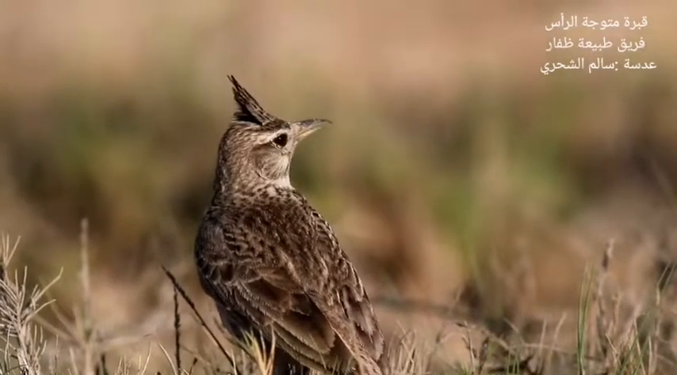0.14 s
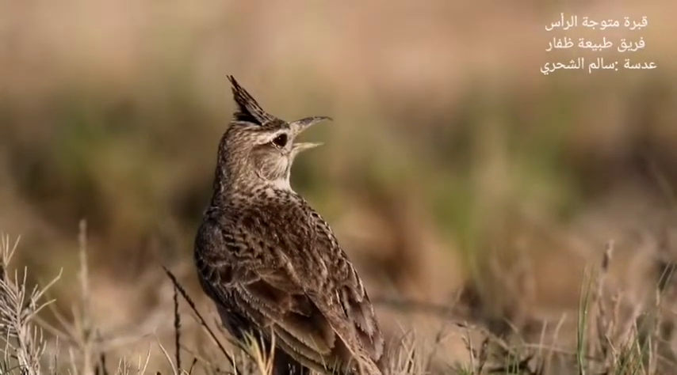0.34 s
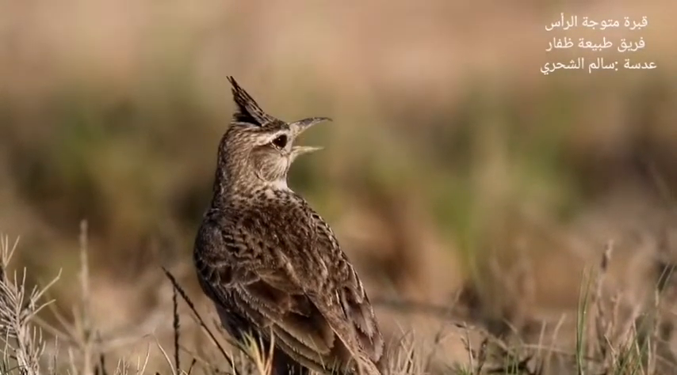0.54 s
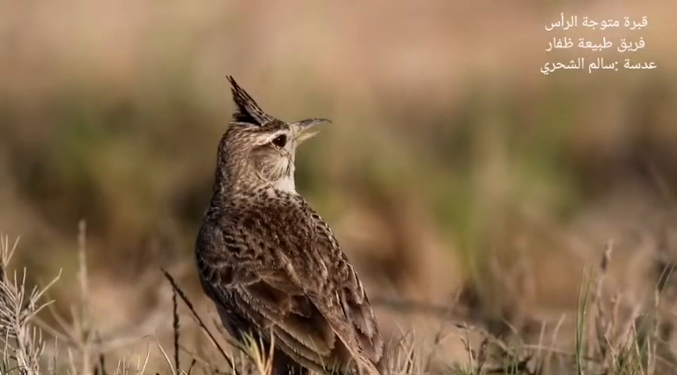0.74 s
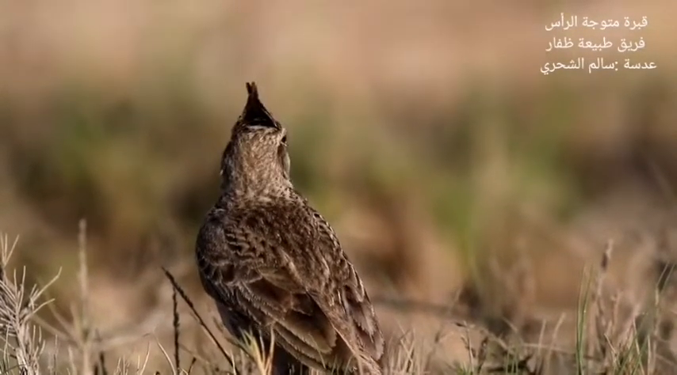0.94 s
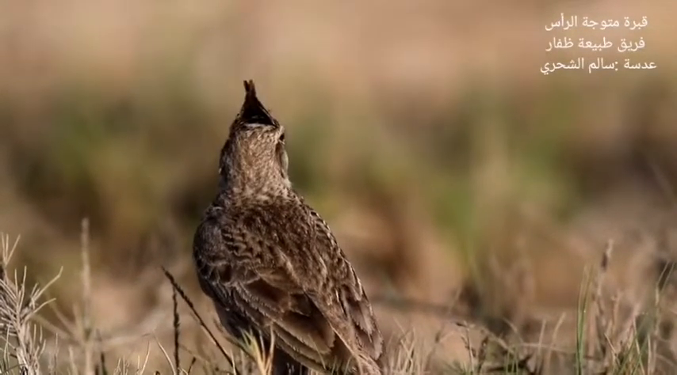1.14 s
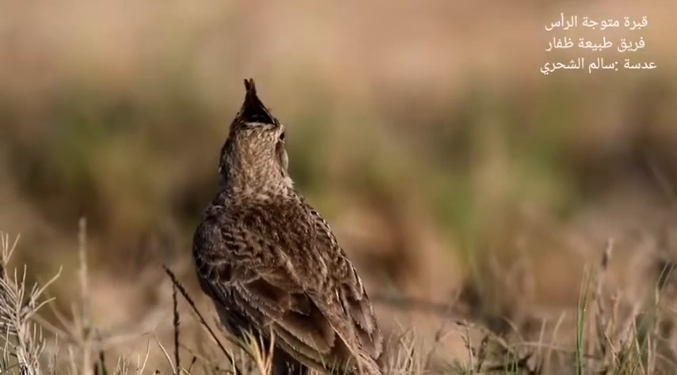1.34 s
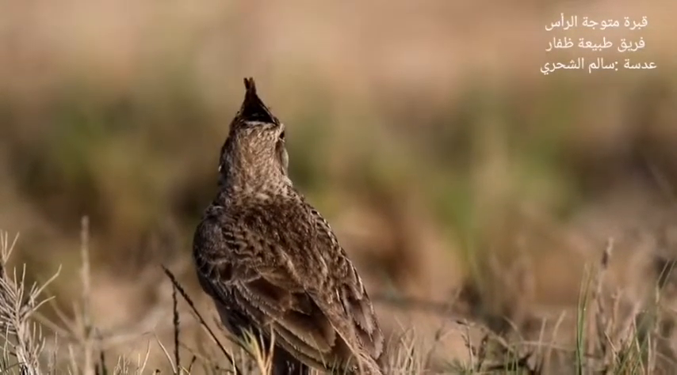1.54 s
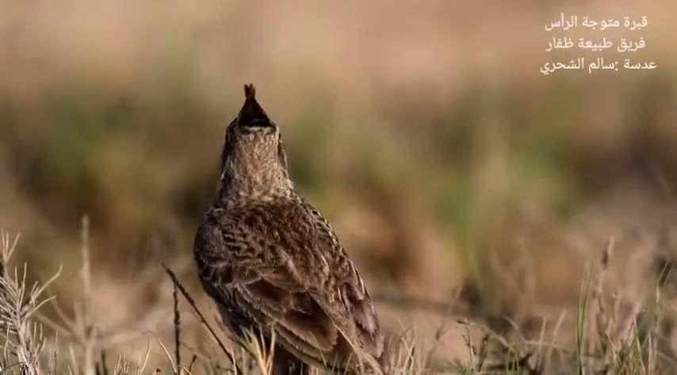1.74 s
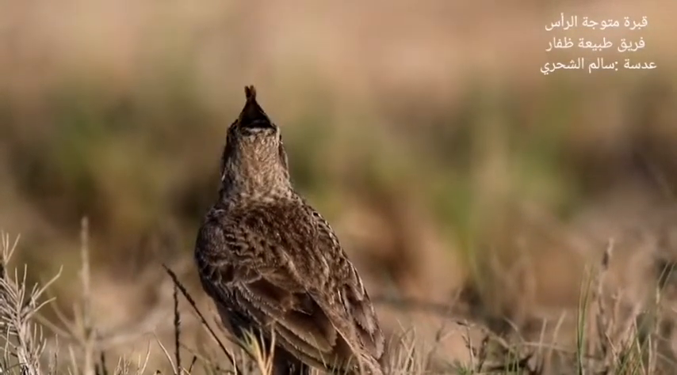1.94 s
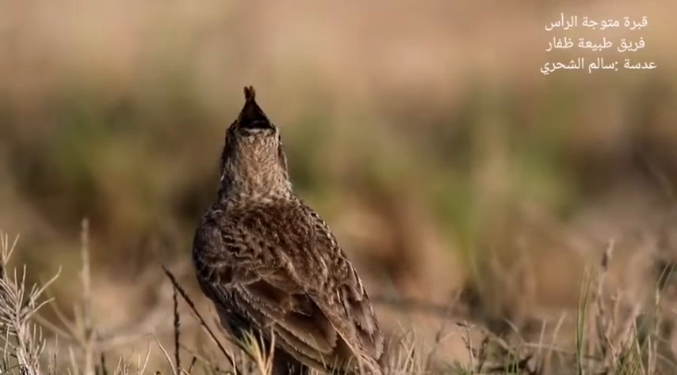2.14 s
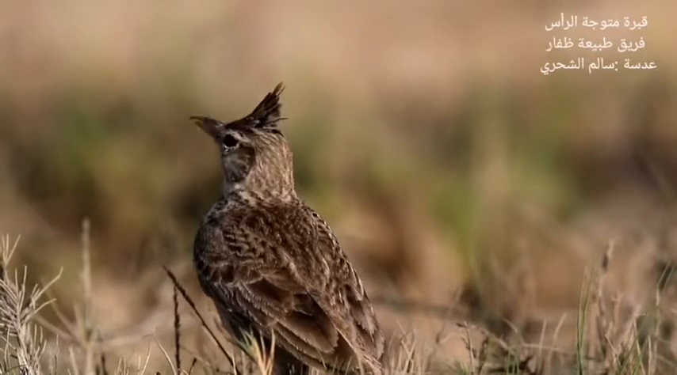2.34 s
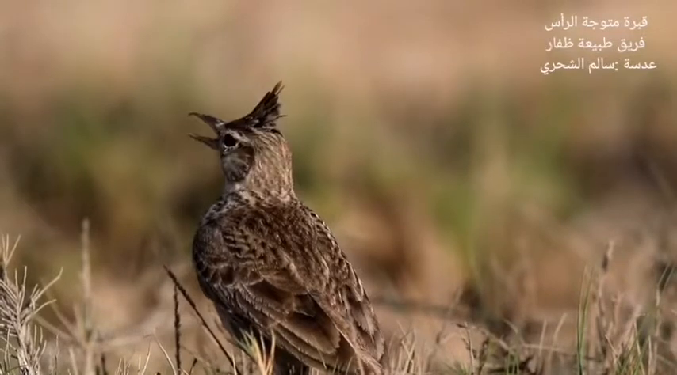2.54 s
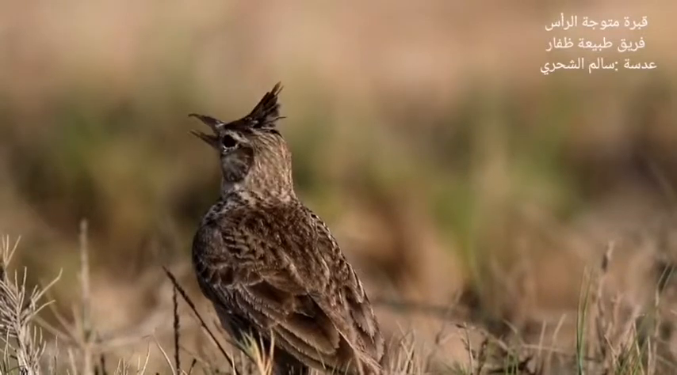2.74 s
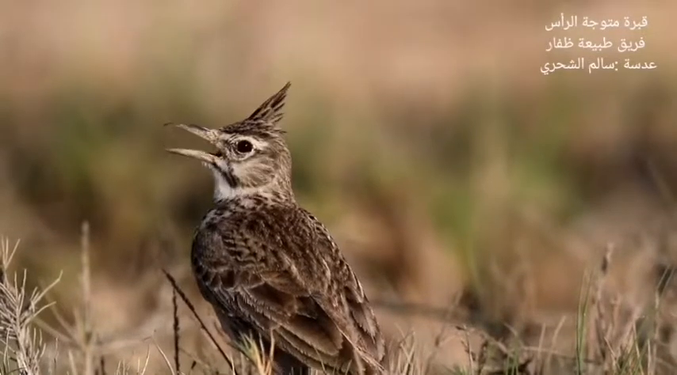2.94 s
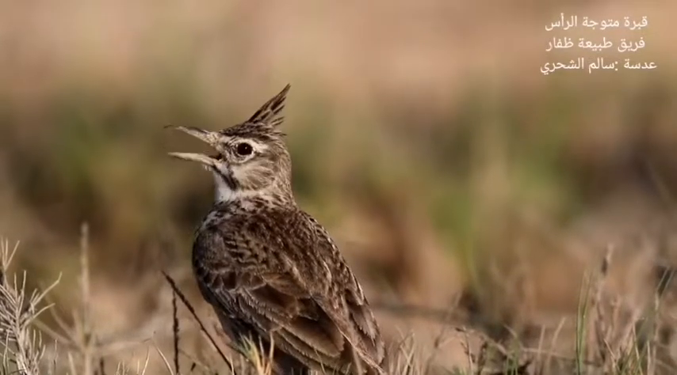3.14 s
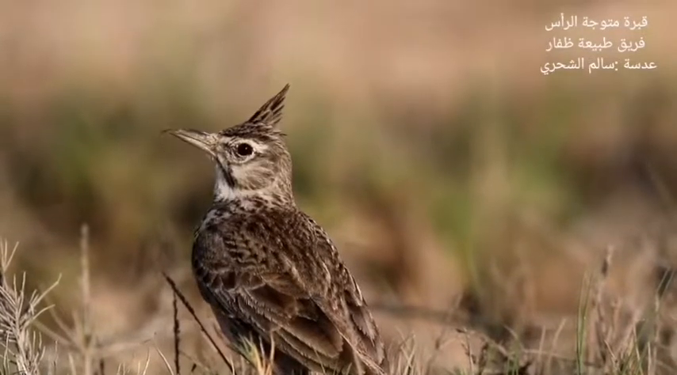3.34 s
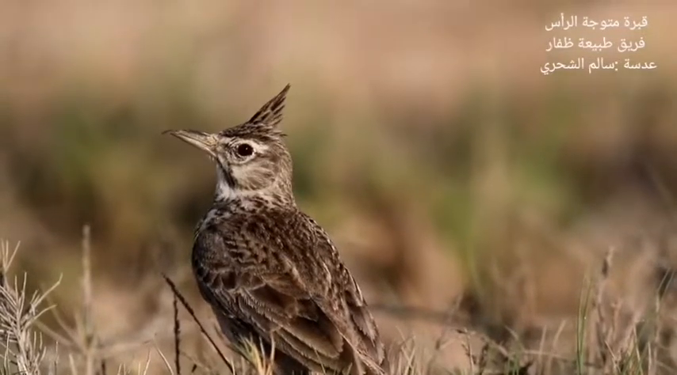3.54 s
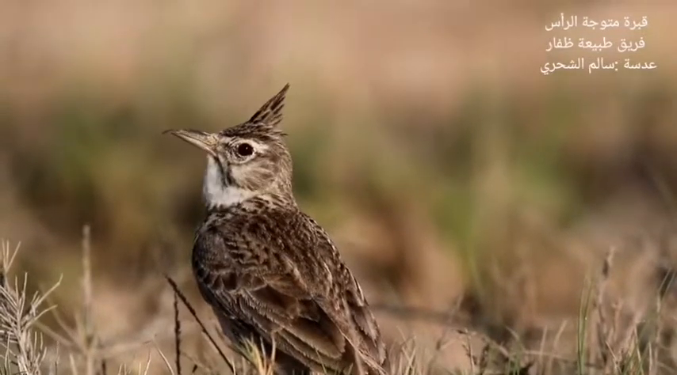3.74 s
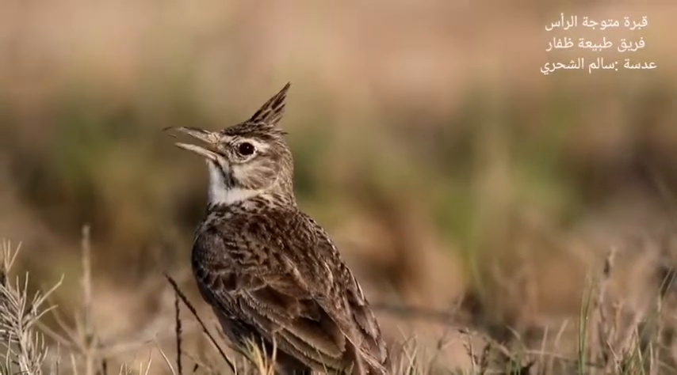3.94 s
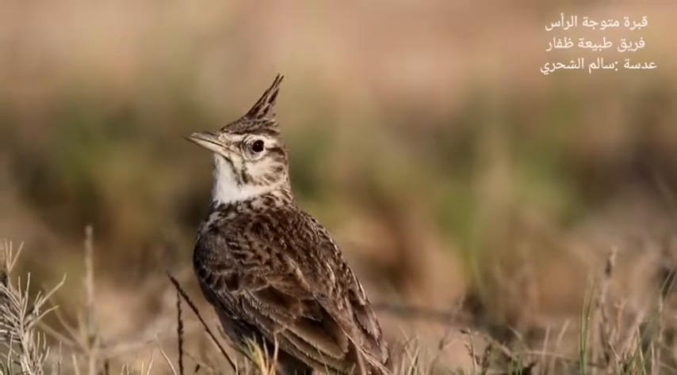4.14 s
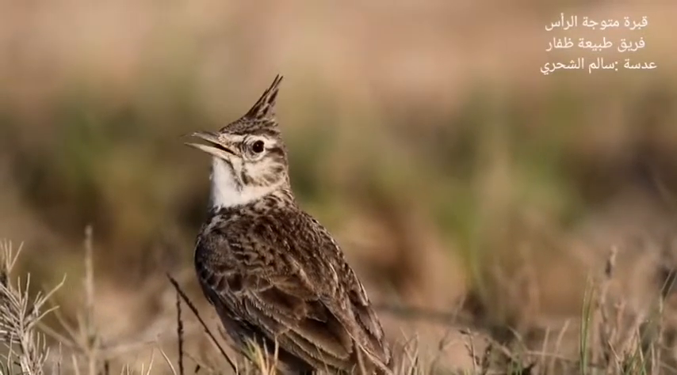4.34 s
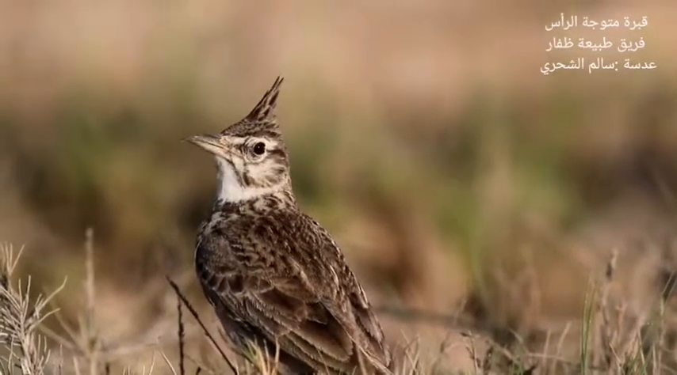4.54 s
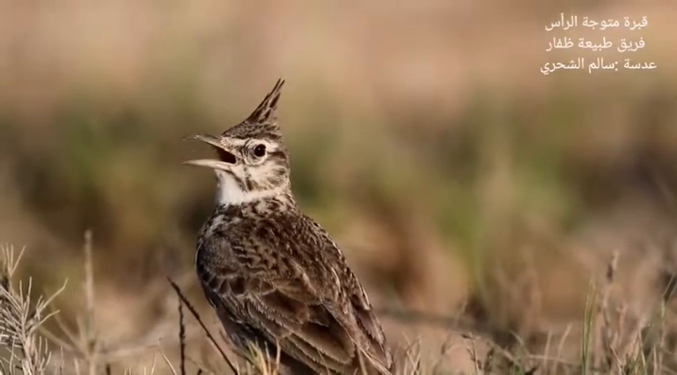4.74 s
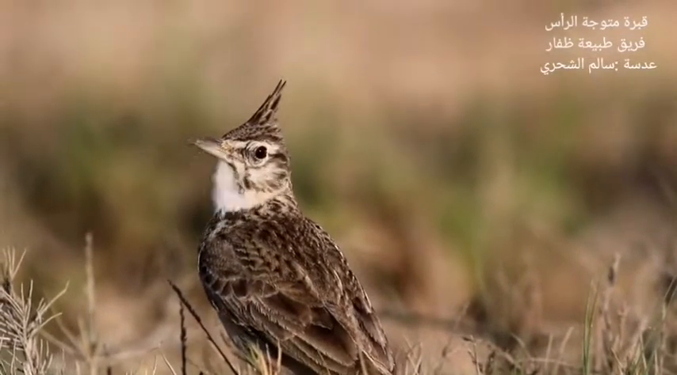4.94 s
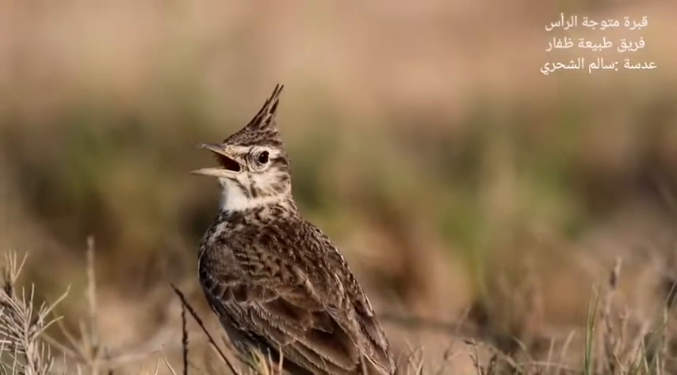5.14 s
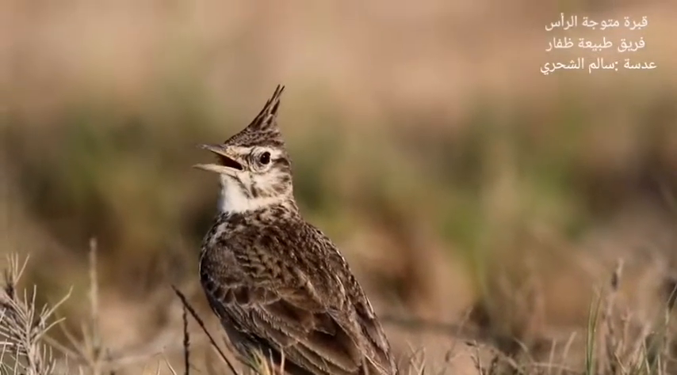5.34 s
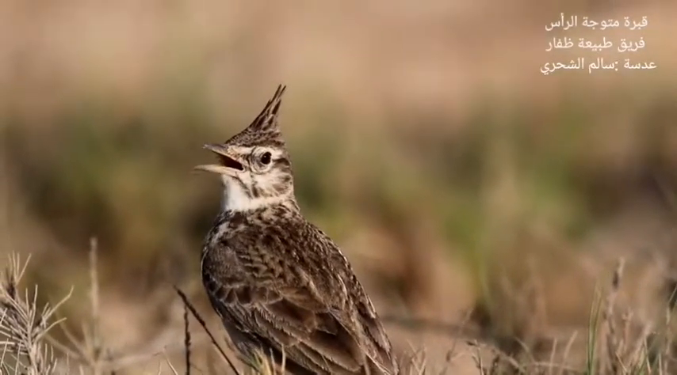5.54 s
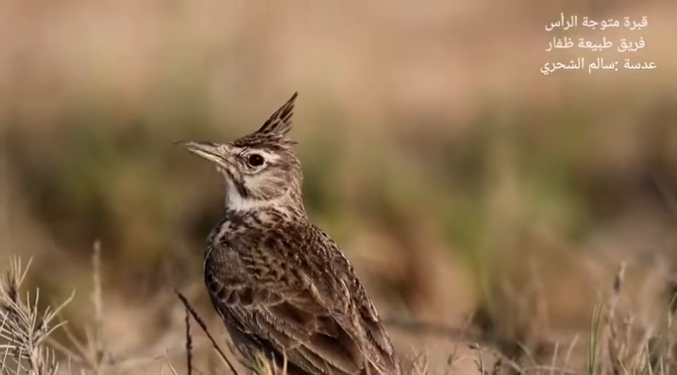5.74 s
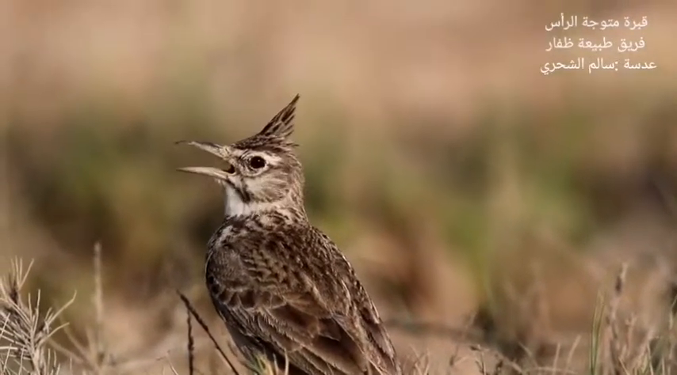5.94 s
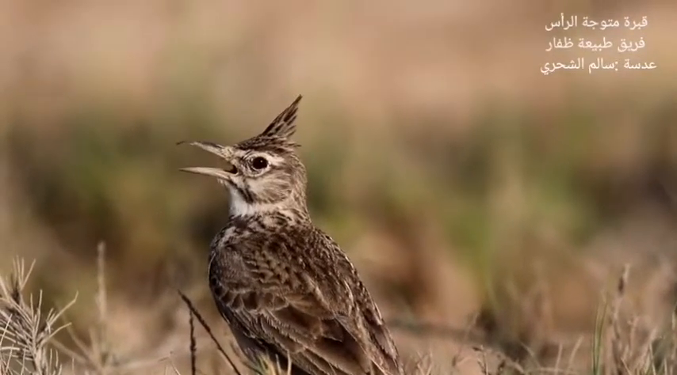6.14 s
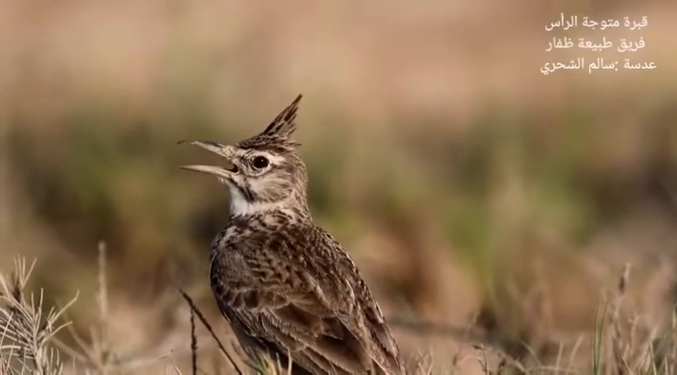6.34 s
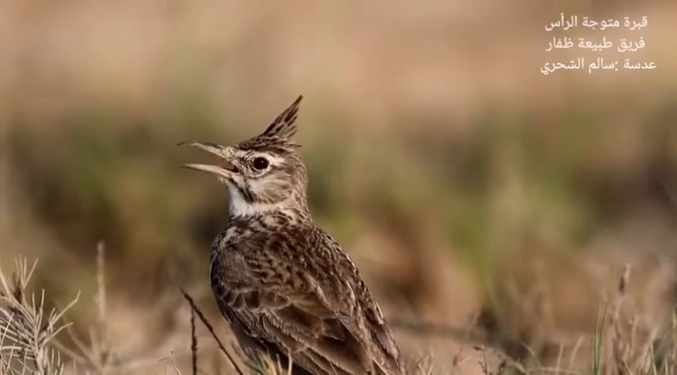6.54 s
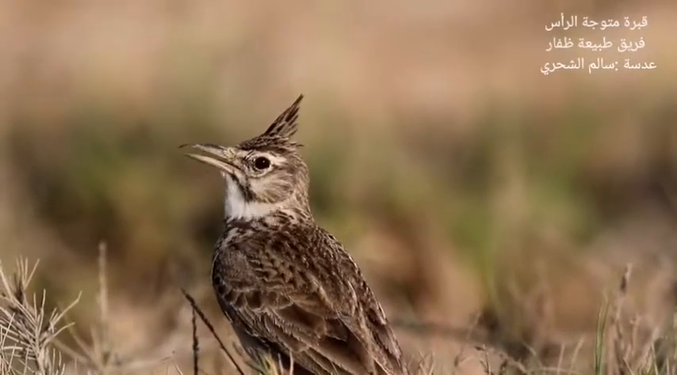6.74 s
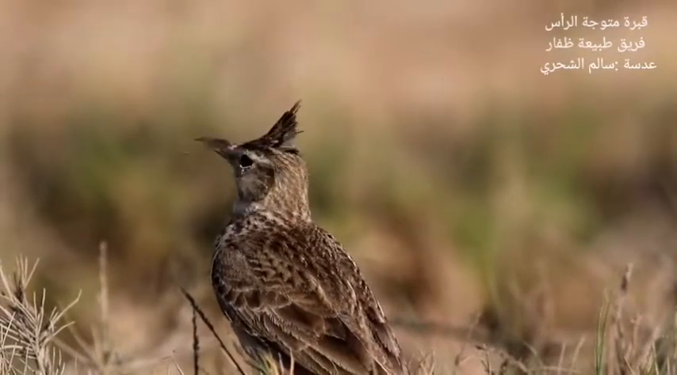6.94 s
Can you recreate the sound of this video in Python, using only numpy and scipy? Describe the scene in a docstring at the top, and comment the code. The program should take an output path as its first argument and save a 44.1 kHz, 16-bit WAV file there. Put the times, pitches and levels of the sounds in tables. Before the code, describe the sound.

A small crested lark sings close by, slurred whistles turning to rasps, chips and quick hooked chirps, over faint low wind rumble.

```python
"""Slurred whistles of a crested lark open close by, over light wind; rasps, pressed falls, chips and hooked chirps follow.
Additive synthesis makes the song: one syrinx tone, its overtones and a half-pitch series, balanced by a throat resonance.
How sound carries at each pitch favours whistles, falls and hooks near 4 kHz; scattering in the scrub adds a faint echo.
Filtered noise makes the air, the wind rumble on the microphone and a few soft ticks.
A gliding sine with a diffuse echo makes another bird, far off."""
import sys
import numpy as np
from scipy import signal
from scipy.fft import rfft, irfft, next_fast_len
from scipy.io import wavfile
from scipy.ndimage import uniform_filter1d, map_coordinates

SR = 44100
rng = np.random.default_rng(int(sys.argv[2]) if len(sys.argv) > 2 else 0)


def generate_wav(signal):
    """Clip the signal to [-1, 1] and save it as 16-bit WAV at the path in sys.argv[1]."""
    frames = np.transpose(np.atleast_2d(signal))
    scaled = np.clip(frames, -1, 1) * 32767
    pcm = np.round(scaled).astype(np.int16)
    wavfile.write(sys.argv[1], SR, pcm)


N = 312228  # samples


def amp(db):
    """Logarithmic level: decibels to amplitude gain."""
    return 10 ** (np.asarray(db) / 20)


def unit(x):
    """Normalisation: scale to rms 1."""
    return x / np.sqrt(np.mean(x ** 2) + 1e-20)


def along(points, hz):
    """Spectral envelope: interpolate (Hz, dB) points on a log frequency axis."""
    point_hz, point_db = np.transpose(points)
    return np.interp(np.log(hz + 1), np.log(point_hz), point_db)


def clock():
    """Sampling: the time of every sample, in seconds."""
    return np.arange(N) / SR


def times(start, end):
    """Sampling: the sample times of one syllable, in seconds."""
    return np.arange(round(start * SR), round(end * SR)) / SR


def window(start, end, fade):
    """Gating: a pulse between two times, with squared-sine edges."""
    t = clock()
    return np.sin(np.pi / 2 * np.clip(np.minimum(t - start, end - t) / fade, 0, 1)) ** 2


def swell(s, attack, release):
    """Amplitude envelope: level in dB of a note that opens and closes."""
    opening = np.clip((s - s[0]) / attack, .01, 1) * np.clip((s[-1] - s) / release, .01, 1)
    return 20 * np.log10(np.sin(np.pi / 2 * opening) * opening ** .5)


def wobble(rate):
    """Slow random modulation: a smooth curve through 'rate' random knots a second."""
    knots = rng.standard_normal(int(N * rate / SR) + 4)
    return map_coordinates(knots, [clock() * rate])


def filtered(x, response):
    """Linear filtering: multiply the spectrum by a response of frequency."""
    m = next_fast_len(N + SR // 2)  # padding keeps the end from wrapping round
    return irfft(rfft(x, m) * response(np.fft.rfftfreq(m, 1 / SR)), m)[:N]


def noise(spectrum):
    """Subtractive synthesis: white noise coloured by a spectrum, at rms 1."""
    return unit(filtered(rng.standard_normal(N), lambda hz: amp(along(spectrum, hz))))


# quiet air of the plain, spectral shape: frequency_hz, relative_level_per_hz_db
AIR_SPECTRUM = [(150, -30.5), (250, 0.5), (466, -4.5), (770, -3), (1320, -5.5), (1990, -2.5), (2580, -14.5),
                (3980, -10.5), (5070, -25.5), (7950, -18), (8670, -20), (14100, -26.5), (15600, -38)]


def air(level_db):
    """Stationary random sound: coloured noise at a constant rms level."""
    return amp(level_db) * noise(AIR_SPECTRUM)


# steady breeze, spectral shape: frequency_hz, relative_level_per_hz_db
BREEZE_SPECTRUM = [(15, -43.5), (25, -13), (90, 1), (188, -7), (219, -13.5), (288, -23), (500, -33),
                   (650, -51.5), (1100, -120)]
# gusts, spectral shape: frequency_hz, relative_level_per_hz_db
GUST_SPECTRUM = [(21, -40.5), (35, -8.5), (96, 0.5), (115, 0), (298, -17), (473, -33.5), (600, -37.5),
                 (780, -69), (1320, -120)]
# bell-shaped gusts on the microphone: centre_s, standard_deviation_s, level_db
GUSTS = [(1.718, 0.078, -37), (1.889, 0.026, -34), (2.162, 0.054, -31), (3.094, 0.054, -35.5),
         (4.502, 0.025, -34.5), (4.57, 0.023, -34), (5.609, 0.027, -32), (5.718, 0.025, -32.5),
         (6.022, 0.0098, -27.5), (6.278, 0.016, -27), (6.366, 0.018, -26), (6.856, 0.16, -30),
         (7.044, 0.019, -31.5)]
# sharp eddies: centre_s, peak_db
EDDIES = [(1.838, -17.5), (4.494, -20.5), (5.613, -13.5)]


def wind(breeze_db, thump_hz, thump_width):
    """Turbulent pressure: a breeze and lumpy gusts of noise; the sharpest eddies give one low push."""
    t = clock()
    gusts = sum(amp(db) * np.exp(-((t - s) / width) ** 2 / 2) for s, width, db in GUSTS)
    lumps = amp(2 * wobble(35))
    breeze = amp(breeze_db + 1.5 * wobble(14)) * noise(BREEZE_SPECTRUM)
    buffeting = gusts * lumps * noise(GUST_SPECTRUM)
    thumps = np.zeros(N)
    for s, db in EDDIES:
        burst = np.exp(-((t - s) / thump_width) ** 2)
        thumps += amp(db) * burst * np.cos(2 * np.pi * thump_hz * (t - s))
    return breeze + buffeting + thumps


# how loud the same push of air sounds at each pitch: pitch_hz, gain_db
CARRY = [(2000, -13.5), (2650, -20.5), (3000, -13.5), (3300, -7), (3600, -2.5), (4000, 0.5), (4300, -5),
         (4550, -12), (4800, -23), (5400, -28.5)]
# slurred whistles: push_db, fade_db (drop over the note), attack_s, release_s, overtones_db, half_series_db,
# curve of (time_s, pitch_hz)
WHISTLES = [ (-13.5, 0, 0.034, 0.027, -37, -55, [(.058, 3330), (.075, 3325), (.108, 3727), (.147, 3490),
            (.17, 3140)]), (-13.5, 0, 0.031, .014, -39.5, -18, [(.264, 2734), (.292, 2787), (.327, 2538),
            (.366, 3390), (.428, 3784), (.445, 3554), (.552, 3480)]),
            (-10.5, 4, 0.017, 0.027, -36, -53, [(.596, 3010), (.62, 4110), (.636, 4860), (.661, 4320),
            (.691, 4010), (.75, 3174), (.787, 2994), (.922, 2596)]),
            (-10.5, 2, 0.04, 0.019, -28.5, -50.5, [(1.11, 4437), (1.152, 3977), (1.205, 3245),
            (1.234, 2750)]), (-14.5, -0.5, 0.028, 0.014, -40, -54, [(1.317, 3710), (1.345, 4260),
            (1.366, 4480), (1.389, 3750), (1.412, 3430), (1.44, 3435), (1.513, 2870), (1.55, 1708)]),
            (-25.5, -4.5, 0.026, .003, -18.5, -44, [(1.63, 4065), (1.642, 4240), (1.645, 3330),
            (1.651, 3013)]), (-10, 8.5, 0.013, 0.013, -19.5, -38, [(1.651, 5205), (1.67, 4588),
            (1.685, 4320), (1.73, 4048), (1.833, 3803), (1.922, 3545)]),
            (-14, 5.5, 0.012, .026, -14.5, -29.5, [(2.165, 3270), (2.176, 3210), (2.186, 3900),
            (2.212, 3983), (2.302, 3852), (2.331, 3735)]),
            (-6.5, 7.5, .005, 0.0061, -28, -17.5, [(2.902, 6100), (2.927, 5770), (2.938, 4980),
            (2.947, 4760)]), (-11.5, 0.5, .01, .02, -31.5, -15.5, [(6.808, 2504), (6.821, 2700),
            (6.83, 2370), (6.869, 3242), (6.897, 3893), (6.912, 4380), (6.935, 3964), (6.958, 3520),
            (6.987, 3000)]), ]


def whistles():
    """Frequency glide: one push of air each, whose loudness follows the pitch."""
    for push_db, fade_db, attack, release, over_db, half_db, curve in WHISTLES:
        when, pitch = np.transpose(curve)
        s = times(when[0], when[-1])
        hz = np.interp(s, when, pitch)
        fade = np.linspace(0, fade_db, len(s))
        db = push_db - fade + along(CARRY, hz) + swell(s, attack, release)
        yield s, hz, db, over_db, half_db


# resonance of windpipe and open beak: frequency_hz, gain_db
THROAT = [(1200, -44.5), (1900, -10.5), (2600, -13), (3300, 8.5), (4000, 8.5), (4600, -4.5), (5300, -14.5),
          (6300, -9.5), (7000, -29.5), (7700, -43.5), (10000, -27), (13500, -28.5), (16000, -32.5)]
# a low tone splits in two fully below one pitch and only faintly above the other;
# the undertone takes a share of the loss
SPLIT_LOW_HZ, SPLIT_HIGH_HZ, SPLIT_LOSS_DB, UNDERTONE_SHARE = 2900, 3650, 34.5, .4


def source_gains(order, pitch, over_db, half_db, slope_db):
    """Period doubling: overtones, and partials halfway between them that weaken as the pitch rises."""
    harmonics = np.where(order == 1, 0, over_db - slope_db * np.abs(np.log2(order / 2)))
    loss_db = np.interp(pitch, [SPLIT_LOW_HZ, SPLIT_HIGH_HZ], [0, SPLIT_LOSS_DB])
    split_db = half_db - loss_db * np.where(order > 1, 1, UNDERTONE_SHARE)
    halves = split_db - slope_db * np.log2(order / 1.51) * np.where(order > 1, 2.8, .6)
    return amp(np.where(order % 1 == 0, harmonics, halves))


def lark(slope_db, jitter, shimmer_db, swing_db, hiss_db, rasp_hiss_db):
    """Source and filter: the throat favours whichever syrinx partial lies near its resonance."""
    t, swing, unsteady = clock(), trill(), wobble(900)
    bend, pulsing, rasping = rasp(sweep=0.061, scatter_db=-1.5, chaos=.19)
    order = np.arange(1, 11)[:, None] / 2  # multiples of the pitch, in half steps
    song, hiss = np.zeros(N), np.zeros(N)
    for s, hz, db, over_db, half_db in syllables():
        i = np.flatnonzero((t >= s.min()) & (t <= s.max()))
        pitch = uniform_filter1d(np.interp(t[i], s, hz), size=130, mode="nearest")
        # a pressed voice is less steady than a pure whistle
        pressed = amp(min(over_db, 0) / 2)
        quick_pitch = (pitch + swing[i]) * bend[i] * (1 + jitter * pressed * unsteady[i])
        edge = np.clip(np.minimum(t[i] - s.min(), s.max() - t[i]) / .002, 0, 1)
        # the voice weakens at the bottom of each swing
        voice_db = np.interp(t[i], s, db) + swing_db * swing[i] / pitch
        level = amp(voice_db) * np.sin(np.pi / 2 * edge) ** 2 * pulsing[i]
        source = source_gains(order, pitch, over_db, half_db, slope_db)
        # dividing by the throat output at the smooth pitch leaves the written level in charge
        throat_output = np.linalg.norm(source * amp(along(THROAT, order * pitch)), axis=0)
        audible = order * quick_pitch < SR / 2
        partials = source * amp(along(THROAT, order * quick_pitch)) * audible / throat_output
        phase = 2 * np.pi * np.cumsum(quick_pitch) / SR
        song[i] += np.sqrt(2) * level * np.sum(partials * np.sin(order * phase), axis=0)
        # pressed and rasping notes carry a fine hiss, more so off the resonance
        breath = amp(hiss_db) * pressed + amp(rasp_hiss_db) * rasping[i]
        hiss[i] += level / np.clip(throat_output, .3, 1) * breath
    shimmer = amp(shimmer_db * wobble(160))
    return song * shimmer + hiss * noise([(1000, -23.0), (4000, -4.5), (7000, -7.5), (15000, -9.5)])


def scrub(x, t60, echo_db):
    """Diffuse scattering: bushes and ground return a short thin echo, as decaying noise."""
    t = np.arange(SR // 2) / SR
    tail = rng.standard_normal(len(t)) * amp(-60 * t / t60) * (t > .006)
    return amp(echo_db) * signal.fftconvolve(x, tail / np.linalg.norm(tail))[:N]


# fast pitch swings: start_s, end_s, rate_hz, depth_hz
TRILLS = [(0.4261, 0.542, 44.3, 650), (0.71, 0.805, 85, 60), (1.3678, 1.428, 97, 348),
          (2.175, 2.333, 41.3, 70), (2.536, 2.701, 40, 55), (2.719, 2.749, 130, 308.5),
          (3.021, 3.078, 66, 80), (3.165, 3.219, 55, 90), (3.242, 3.266, 96, 275.2),
          (6.872, 6.967, 108.7, 130)]


def trill():
    """Frequency modulation: pitch offset in Hz of the fast swings, which grow and die away."""
    t = clock()
    offset = np.zeros(N)
    for start, end, rate, depth in TRILLS:
        grow_and_die = window(start, end, .2 * (end - start))
        offset += depth * grow_and_die * np.sin(2 * np.pi * rate * (t - start))
    return offset


# colour of the ticks: frequency_hz, relative_level_db
TICK_COLOUR = [(150, 5.5), (400, 3), (1000, -2.5), (1800, 8.5), (4000, -15.5), (15000, -32.5)]
# soft ticks: start_s, level_db
TICKS = [(1.572, -29.5), (1.655, -30), (1.735, -30.5), (3.212, -37.5)]


def ticks(t60):
    """Damped impulse: abrupt bursts of dull noise that die away without ringing."""
    t = clock()
    decays = sum(amp(db - 60 * np.abs(t - s) / t60) * (t > s) for s, db in TICKS)
    return noise(TICK_COLOUR) * decays


# harsh notes: overtones_db, half_series_db, curve of (time_s, pitch_hz, level_db)
CREAKS = [ (-13, -43, [(2.098, 2120, -39), (2.113, 2355, -37), (2.132, 2010, -42)]),
          (-12, -6, [(2.941, 3950, -44), (2.944, 3740, -34.5), (2.947, 3000, -47.5)]),
          (-3, -26.5, [(4.758, 1905, -39), (4.79, 2011, -20), (4.803, 2550, -35.5), (4.83, 3545, -18),
          (4.852, 3804, -13.5), (4.871, 3472, -17), (4.895, 2524, -41), (4.909, 2117, -27),
          (4.916, 1650, -45)]), (-44, -41, [(5.019, 2130, -34.5), (5.09, 2300, -41)]),
          (-21.5, 0.5, [(5.167, 3995, -38.5), (5.177, 3900, -20.5), (5.222, 3880, -24),
          (5.229, 3450, -26.5), (5.26, 3016, -31), (5.29, 2776, -24.5), (5.318, 2610, -21.5),
          (5.372, 2437, -23.5), (5.4, 2580, -47)]), (-11, 3, [(5.45, 3810, -13.5), (5.478, 3590, -22.5),
          (5.499, 3720, -26)]), (3.5, -17.5, [(5.5, 1583, -28.5), (5.511, 1600, -26.5), (5.522, 2023, -21),
          (5.53, 2520, -41)]), (-12.5, -29.5, [(5.529, 2570, -37), (5.536, 2850, -27.5),
          (5.55, 3026, -22.5), (5.562, 3753, -10), (5.571, 3912, -10.5), (5.587, 3976, -18.5),
          (5.604, 3845, -59)]), (-15.5, 3.5, [(5.656, 4226, -19), (5.662, 3594, -11.5),
          (5.68, 3730, -35.5)]), ]


def creaks():
    """Spectral balance: overtones or the half-pitch series colour each drawn pitch and level curve."""
    for over_db, half_db, curve in CREAKS:
        s, hz, db = np.transpose(curve)
        yield s, hz, db, over_db, half_db


# the tone breaks into falling pulses: start_s, end_s, rate_hz, unevenness (0 to 1)
RASPS = [(2.112, 2.14, 250, 0.7), (2.163, 2.175, 280, .5), (2.488, 2.495, 370, 0.7),
         (3.692, 3.712, 160, 0.5), (3.991, 4.007, 200, 0.5), (4.25, 4.273, 300, 0.4),
         (4.758, 4.796, 450, 0.7), (5.02, 5.087, 78, 0.1), (5.171, 5.249, 290, .6),
         (5.445, 5.512, 280, .65), (5.659, 5.679, 320, 0.8)]


def rasp(sweep, scatter_db, chaos):
    """Pulsed phonation: pitch factor, gain and presence; pulses swell and slide down, uneven ones merge."""
    t, drift, stray, size = clock(), wobble(600), wobble(1100), wobble(450)
    bend, gain, presence = np.ones(N), np.ones(N), np.zeros(N)
    for start, end, rate, uneven in RASPS:
        # each rasp melts into the tone
        melt = np.clip((end - t) / (uneven * (end - start)), 0, 1) ** .5
        on = window(start, end, 0.0025) * melt
        turn = 2 * np.pi * np.cumsum((t > start) * rate * (1 + uneven * drift)) / SR
        bend += on * (sweep * np.sin(turn) + chaos * uneven * stray)
        pulse = 1 - (1 - uneven) * np.cos(turn)
        gain += on * (0.79 * amp(scatter_db * uneven * size) * pulse - 1)
        presence += on * uneven
    return bend, gain, presence


# the far bird: time_s, pitch_hz, level_db
FAR_SONG = [(2.32, 4260, -58), (2.365, 4350, -62), (2.44, 3200, -63.5), (2.501, 3300, -91),
            (3.221, 4030, -90), (3.27, 4030, -62.5), (3.338, 4650, -61.5), (3.419, 4010, -60.5),
            (3.46, 4360, -53.5), (3.495, 5020, -72), (3.56, 4060, -61), (3.597, 4080, -72),
            (3.689, 3750, -55.5)]


def far_bird():
    """Reverberant distance: a faint gliding sine, blurred by a strong diffuse echo."""
    s, hz, db = np.transpose(FAR_SONG)
    phase = 2 * np.pi * np.cumsum(np.interp(clock(), s, hz)) / SR
    level = amp(np.interp(clock(), s, db)) * window(s[0], s[-1], 0.018)
    whistle = level * np.sin(phase)
    return whistle + scrub(whistle, t60=.35, echo_db=-4.5)


# pressed falls towards a resting pitch, which may flick back up: start_s, fall_s, flick_s, top_hz, rest_hz,
# settling_s, push_db, flick_push_db, overtones_db
FALLS = [(2.489, .231, .037, 3987, 2620, 0.022, -13.5, -18, -4.5),
         (2.841, .068, 0.0045, 4320, 1500, .135, -12.5, -20, -0.5),
         (3.005, .08, .037, 3992, 2137, .079, -9.5, -10.5, 0),
         (3.154, .083, .032, 3915, 2250, .068, -10.5, -20.5, 0.5)]
FLICK_HZ, FLICK_S = 4030, .013  # where a full flick lands, and how long it takes


def falls(attack, release, steepness, half_db):
    """Exponential relaxation: a hard start, a fall to a thin low tone, and a flick towards the resonance."""
    for start, fall, flick, top_hz, rest_hz, settle, push_db, flick_db, over_db in FALLS:
        s = times(start, start + fall + flick)
        up = np.clip((s - start - fall) / FLICK_S, 0, 1)
        sinking_hz = rest_hz + (top_hz - rest_hz) * np.exp((start - s) / settle)
        hz = (1 - up) * sinking_hz + up * FLICK_HZ
        push = (1 - up) * push_db + up * flick_db
        yield s, hz, push + steepness * along(CARRY, hz) + swell(s, attack, release), over_db, half_db


# chips that dip, spring up to a short tone and bounce on it: dip_s (time of the dip), dip_hz, tone_hz, spring_s,
# bounce_hz, dip_db, tone_db, length_s
CHIPS = [(3.71, 1830, 3057, 0.0096, 67, -39.5, -17.5, .047),
         (3.845, 1542, 2220, .009, -1.5, -37.5, -25.5, .043),
         (4.005, 2025, 3245, .012, 101, -32.5, -11.5, 0.05), (4.126, 1660, 2626, .010, 4.5, -33, -28, .046),
         (4.269, 2520, 3463, 0.015, 170, -29, -8.5, 0.047),
         (4.408, 1900, 2827, 0.013, 2, -28, -20.5, 0.068)]


def chips(lead, dip_share, sag, rise, attack, release_share, over_db, half_db):
    """Elastic rebound of pitch: quiet through the dip, loud on the slowly sagging tone after it."""
    for dip, dip_hz, tone_hz, spring, bounce_hz, dip_db, tone_db, length in CHIPS:
        s = times(dip - lead, dip + length)
        u = s - dip
        bounce = bounce_hz * np.sin(np.pi * np.maximum(u / spring - .5, 0))
        tone = tone_hz * (1 - sag * (u / length - .5)) + bounce
        hz = tone + (dip_hz - tone) * np.exp(-np.abs(u / (dip_share * spring)) ** 2.5)
        db = np.interp(u, [0, rise * spring], [dip_db, tone_db])
        yield s, hz, db + swell(s, attack, release_share * length), over_db, half_db


# soft scoops that lead into the low chips: centre_s, bottom_hz, level_db
SCOOPS = [(3.817, 1920, -30.5), (4.098, 2462, -29.5), (4.377, 2314, -25)]


def scoops(half_length, bow_hz, over_db, half_db):
    """Parabolic glide: a shallow bowl of pitch that swells and fades."""
    for centre, bottom_hz, db in SCOOPS:
        s = times(centre - half_length, centre + half_length)
        hz = bottom_hz + bow_hz * ((s - centre) / half_length) ** 2
        yield s, hz, db + swell(s, half_length, half_length / 2), over_db, half_db


# U-shaped chirps, each announced by a falling blip: centre_s, bottom_hz, push_db, blip_db
HOOKS = [(5.918, 5200, -12, -35), (5.971, 4420, -10.5, -38.5), (6.026, 4085, -10.5, -41),
         (6.084, 4163, -12.5, -49), (6.144, 4230, -11, -37.5), (6.208, 4363, -10.5, -33.5)]


def blips(length, lead, high_hz, low_hz):
    """Two-voiced syrinx: the second voice flicks downward just before a hooked chirp."""
    out = np.zeros(N)
    t = times(0, length)
    phase = 2 * np.pi * np.cumsum(high_hz + (low_hz - high_hz) * t / length) / SR
    blip = np.sqrt(2) * np.hanning(len(t)) * np.sin(phase)
    for centre, _, _, db in HOOKS:
        out[round((centre - lead) * SR):][:len(t)] += amp(db) * blip
    return out


def hooks(before, after, bow_hz, attack, release, over_db, half_db):
    """Power-law glide: the pitch swoops down and starts back up, louder where it carries best."""
    for centre, bottom_hz, push_db, _ in HOOKS:
        s = times(centre - before, centre + after)
        hz = bottom_hz + bow_hz * np.abs((s - centre) / before) ** 2.6
        yield s, hz, push_db + along(CARRY, hz) + swell(s, attack, release), over_db, half_db


# shape of a thin call that whips up and settles: time_after_start_s, pitch_hz, level_db
WHIP_SHAPE = [(0, 3110, -48.5), (.005, 3550, -20.5), (.009, 4450, -21), (0.013, 5560, -35.5),
              (0.029, 4880, -34), (0.042, 4697, -24), (.069, 4570, -28.5), (.088, 4490, -22.5),
              (.106, 4540, -30.5), (0.122, 4600, -47.5)]
# when the call comes: start_s, gain_db
WHIPS = [(6.317, 0.94), (6.507, -1.3)]


def whips(over_db, half_db):
    """Stereotyped gesture: one pitch and level contour, sung twice."""
    s, hz, db = np.transpose(WHIP_SHAPE)
    for start, gain_db in WHIPS:
        yield start + s, hz, db + gain_db, over_db, half_db


def syllables():
    """Superposition of the song's syllables: (times, pitch Hz, level dB, overtones dB, half-series dB)."""
    return [
        *whistles(),
        *creaks(),
        *falls(attack=0.0057, release=0.027, steepness=1.475, half_db=-32.5),
        *chips(lead=.016, dip_share=.62, sag=.07, rise=1.44, attack=0.0081, release_share=0.66,
               over_db=-46, half_db=-48.5),
        *scoops(half_length=0.019, bow_hz=480, over_db=-50.5, half_db=-52),
        *hooks(before=.021, after=0.018, bow_hz=1700, attack=0.0019, release=.008,
               over_db=-5.5, half_db=-23.5),
        *whips(over_db=-7, half_db=-24),
    ]


def scene():
    """Linear superposition: the lark and its echo, the far bird, the wind, the ticks and the air."""
    song = lark(slope_db=9.5, jitter=0.0045, shimmer_db=0.93, swing_db=13, hiss_db=-40, rasp_hiss_db=-27)
    song = song + blips(length=0.012, lead=.028, high_hz=3900, low_hz=2700)
    quiet = air(level_db=-54.0)
    breeze = wind(breeze_db=-46.5, thump_hz=123, thump_width=0.0054)
    echo = scrub(song, t60=0.12, echo_db=-35.5)
    return (song + echo + far_bird() + breeze + ticks(t60=0.053) + quiet)[None]


TOP_HZ = 15750


def record(dry):
    """Band limiting: nothing at or above the top frequency passes."""
    return filtered(dry[0], lambda hz: hz < TOP_HZ)[None]


dry = scene()
out = record(dry)
generate_wav(out)
```